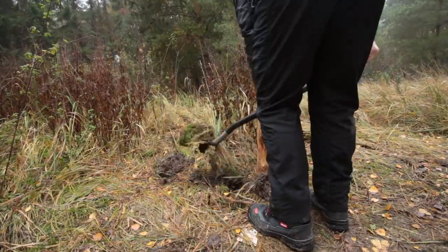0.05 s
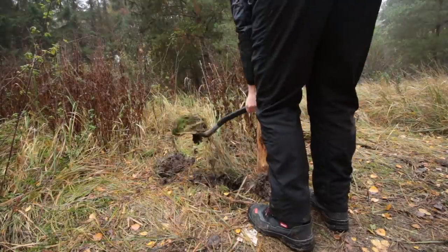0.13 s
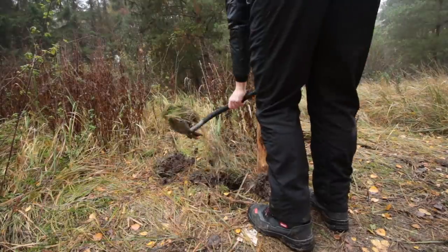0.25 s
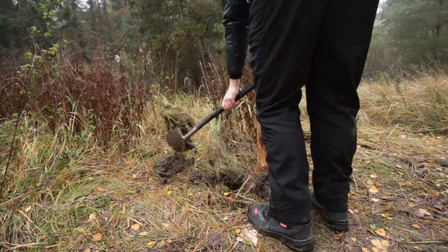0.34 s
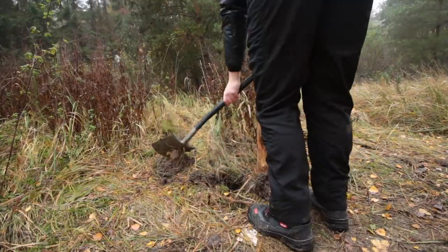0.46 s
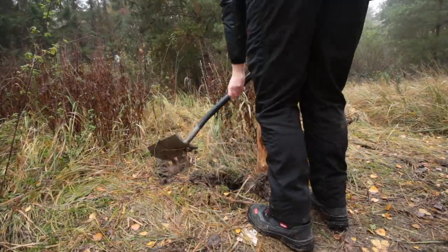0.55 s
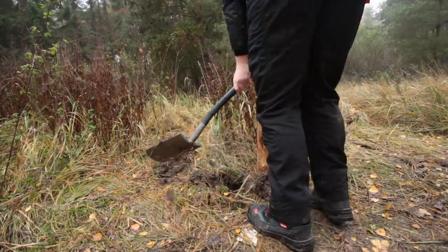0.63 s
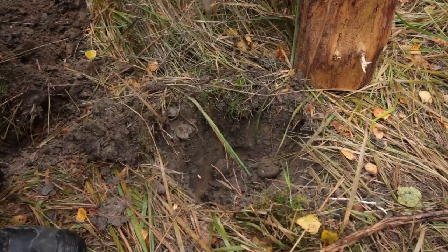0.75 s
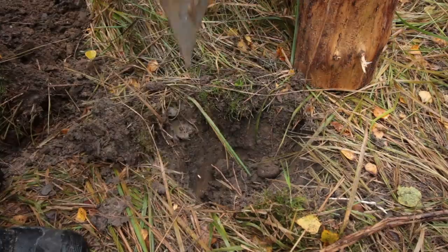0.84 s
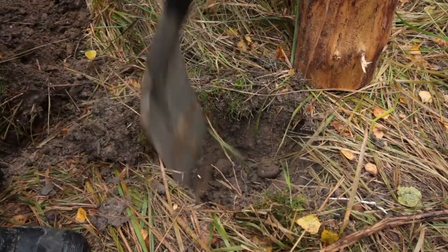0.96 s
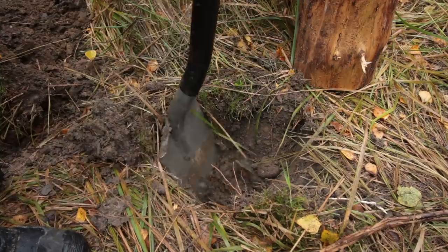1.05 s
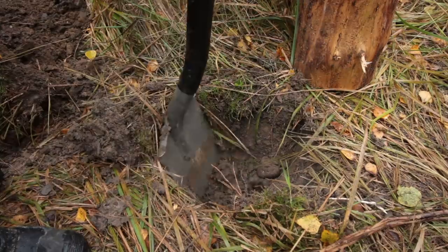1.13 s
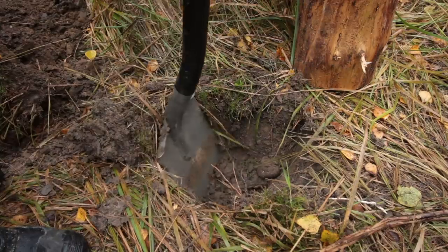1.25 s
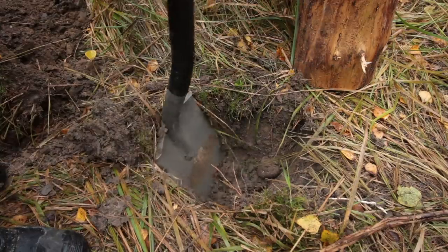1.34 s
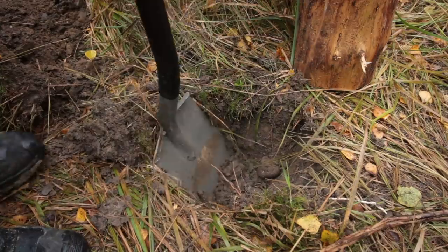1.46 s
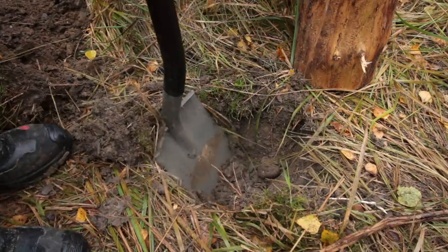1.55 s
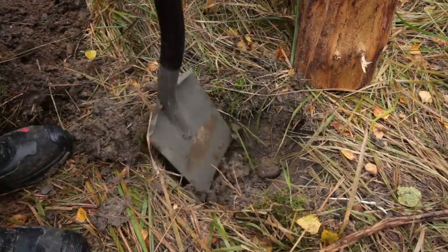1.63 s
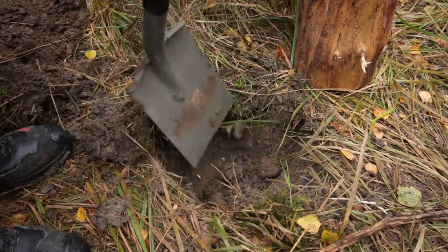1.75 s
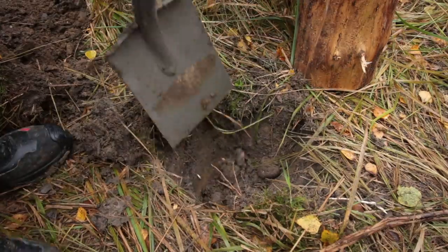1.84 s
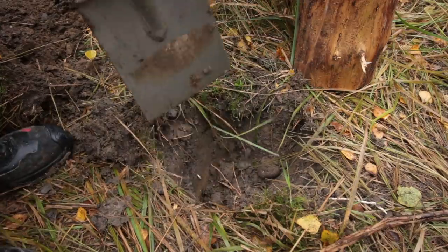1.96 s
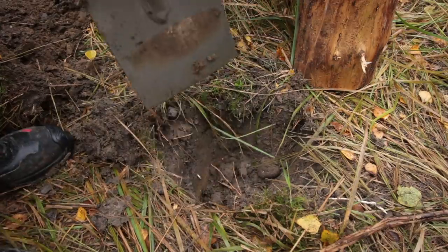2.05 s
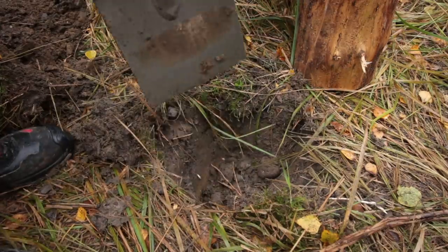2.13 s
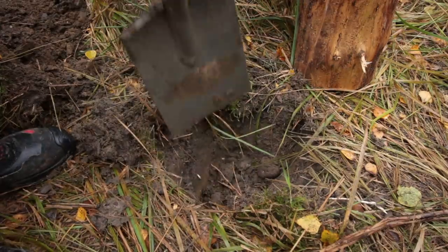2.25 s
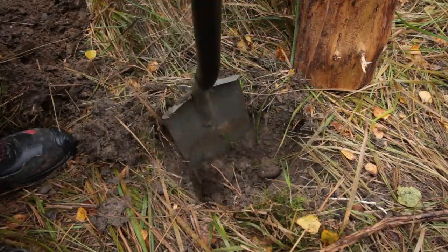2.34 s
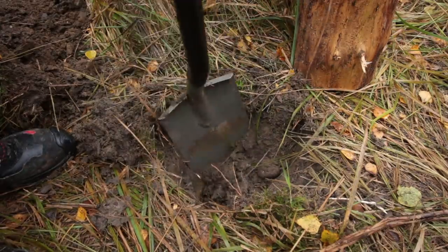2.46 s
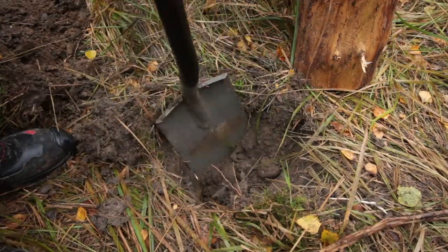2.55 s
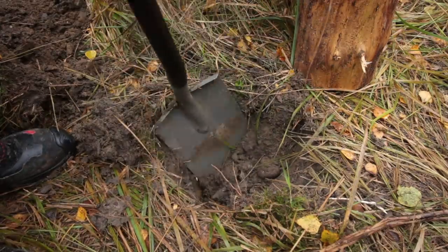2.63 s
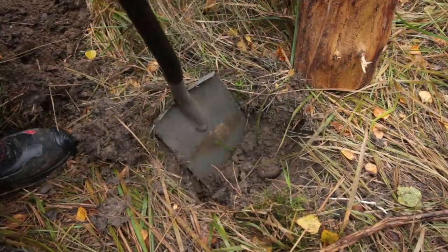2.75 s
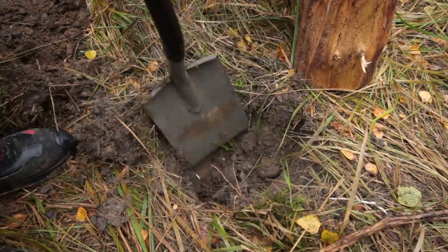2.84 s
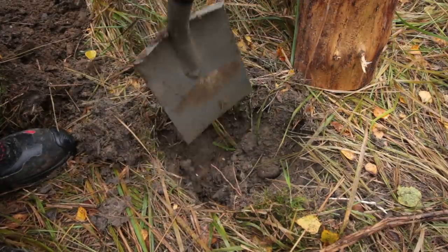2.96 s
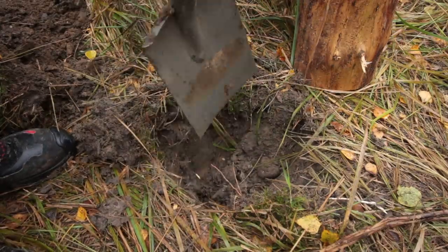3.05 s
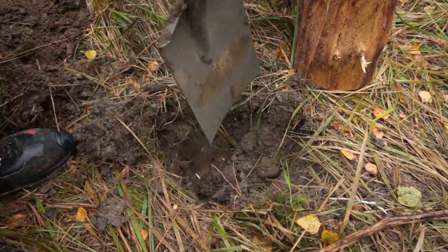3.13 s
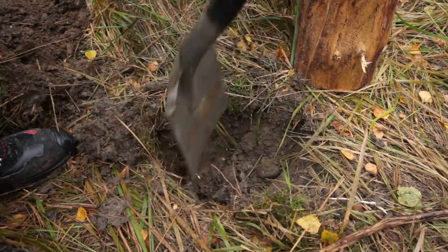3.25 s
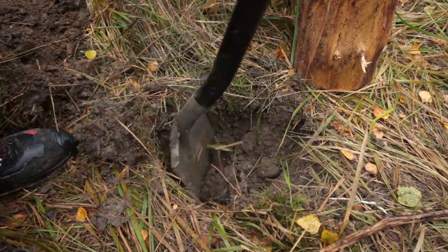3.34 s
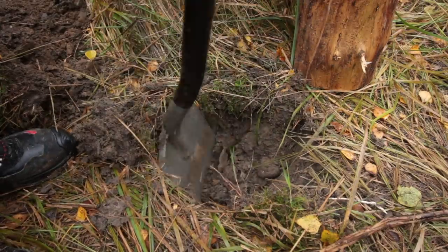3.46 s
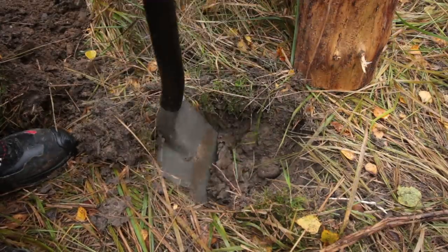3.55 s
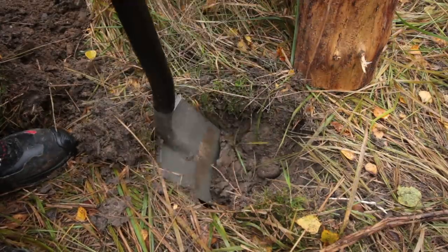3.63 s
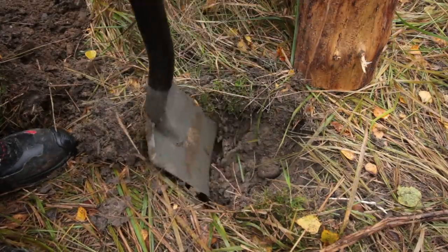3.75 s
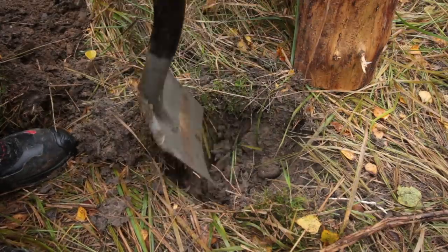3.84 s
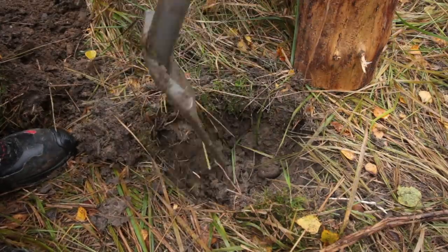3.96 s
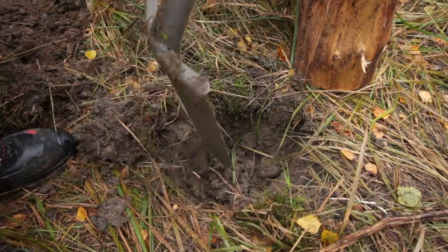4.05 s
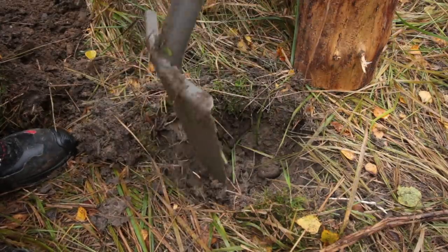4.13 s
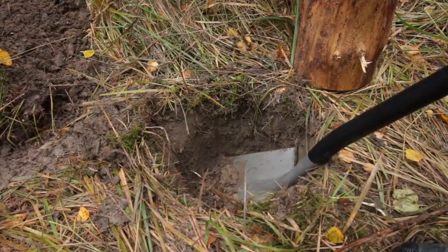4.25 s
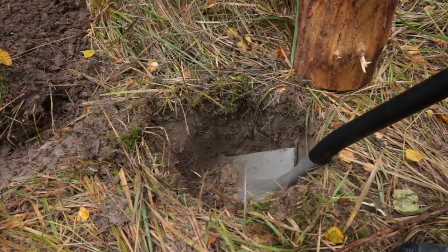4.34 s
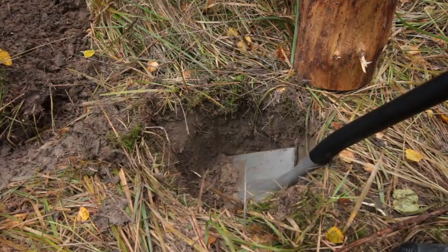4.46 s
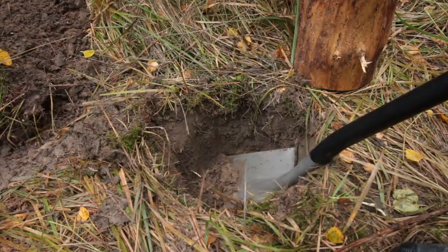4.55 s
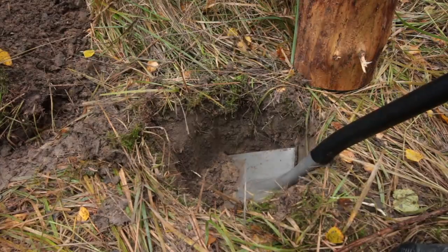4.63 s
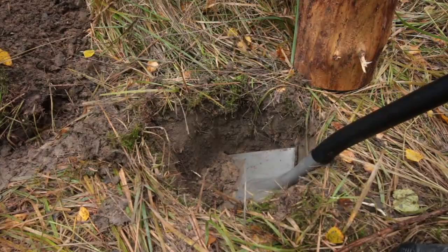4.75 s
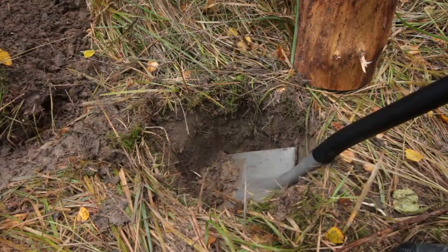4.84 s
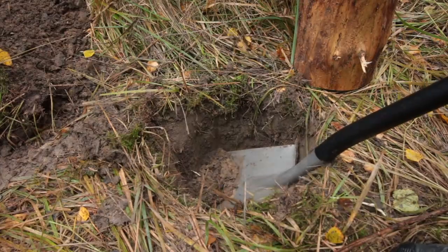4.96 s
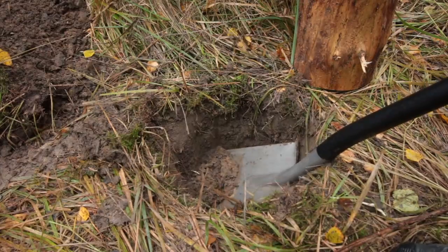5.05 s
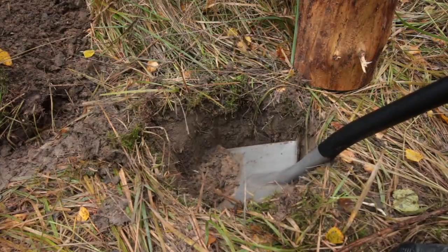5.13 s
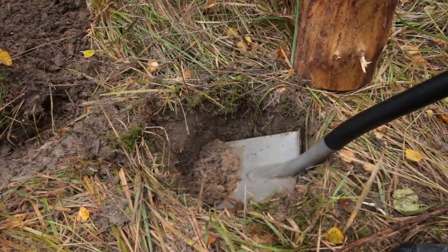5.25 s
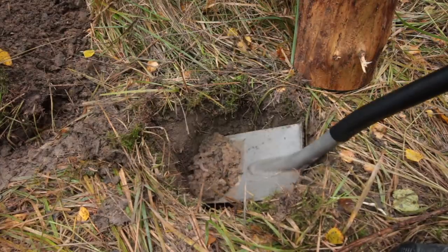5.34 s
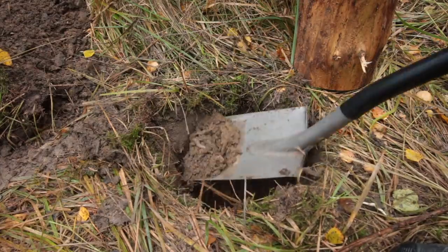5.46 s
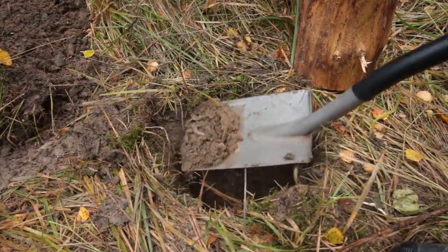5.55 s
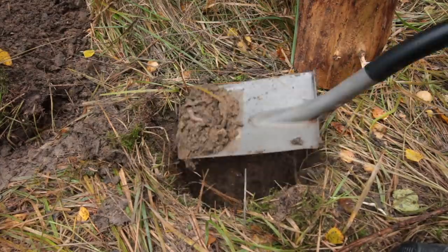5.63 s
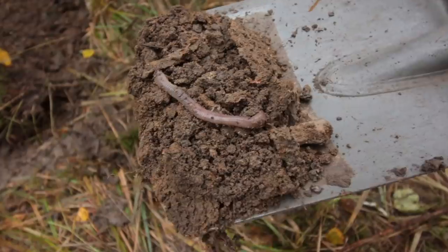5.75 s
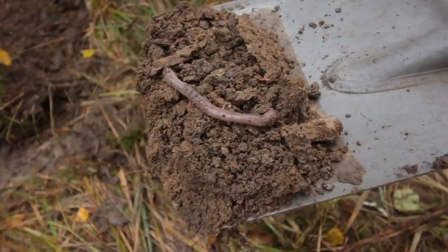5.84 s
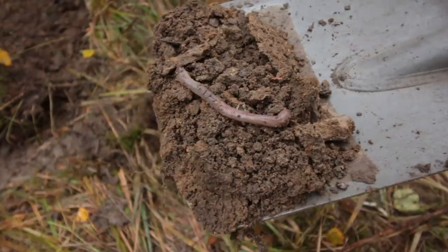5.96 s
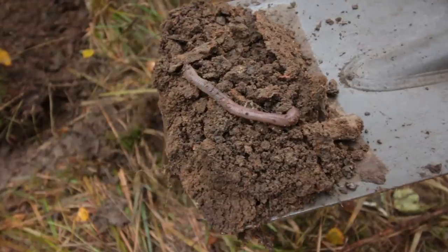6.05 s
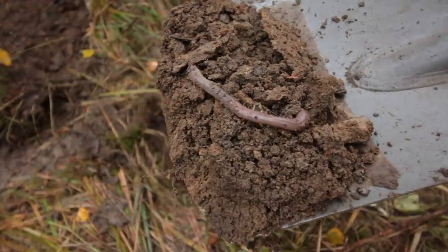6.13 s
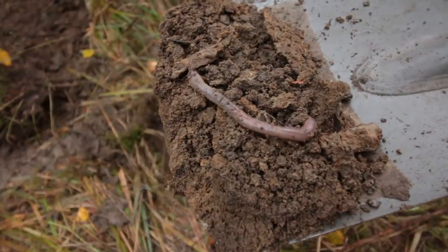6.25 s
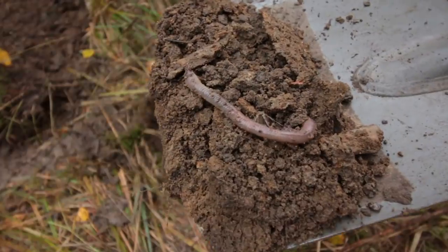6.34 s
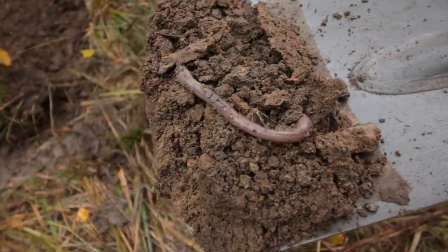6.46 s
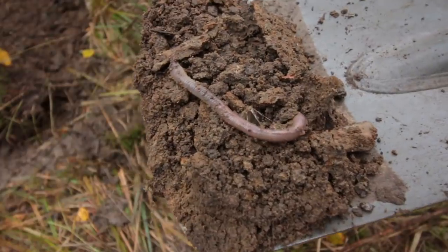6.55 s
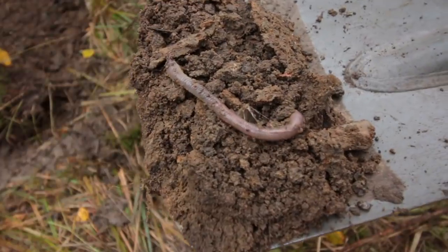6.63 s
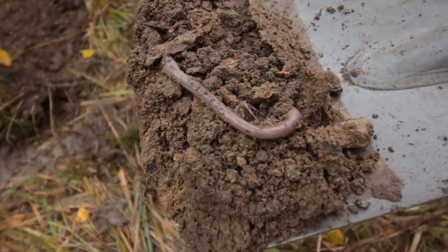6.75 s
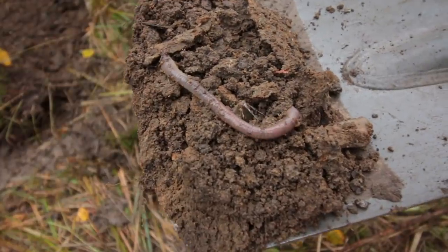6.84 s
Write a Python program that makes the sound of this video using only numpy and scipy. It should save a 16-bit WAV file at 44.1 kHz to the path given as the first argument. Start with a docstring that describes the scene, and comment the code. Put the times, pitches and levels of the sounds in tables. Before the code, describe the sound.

A quiet outdoor forest floor, heard close and dry over low air and microphone hiss. From 0 to 0.8 s cloth rustles softly and a boot crackles through dry grass. At about 1.05 s a steel spade stabs damp soil with a loud, bright, clipped crunch and low thump; faint gritty scrapes and thin steel ringing follow until 1.8 s. Cloth moves quietly. A second hard stab lands at 2.4 s, with grinding at 2.6 s and a soft metallic knock and ring near 2.85 s. The third and heaviest hits at 3.37 s, overloading, followed by dense snaps, scraping and a ringing withdrawal to 3.9 s. After cloth rustle, 4.35 to 5.1 s brings gentler pushes: root snaps, crumbling earth, short scrapes. Light grit and rustling accompany the lift until about 5.7 s, then only hiss with very faint thin whining tones remains.

```python
"""Forest floor, damp soil, quiet outdoors: a steel spade is stabbed in three times, worked to and fro,
pulled out ringing faintly, then pushed under a clod and lifted. Crowds of small fractures make the snaps and
crumbles, damped low swings the thumps; filtered clicks grind as grit and drive the ringing steel modes.
Cloth and grass rustle between the strokes over air and microphone hiss; the hardest blows overload the recorder."""
import sys
import numpy as np
from scipy import signal
from scipy.fft import rfft, irfft
from scipy.io import wavfile

SR = 44100
rng = np.random.default_rng(int(sys.argv[2]) if len(sys.argv) > 2 else 0)


def wav_record(signal):
    """Record a signal, one row per channel, as 16-bit PCM in the file named by sys.argv[1]."""
    frames = np.transpose(np.atleast_2d(signal))
    bounded = np.clip(frames, -1, 1)
    # unit amplitude maps onto the largest positive 16-bit level
    quanta = np.round(bounded * 32767).astype(np.int16)
    wavfile.write(sys.argv[1], SR, quanta)


def volts(x):
    """Linear amplitude factor 10**(x/20) for a level x in dB, scalar or array-like."""
    e = np.asarray(x, float) / 20
    return 10 ** e


N = 303928  # length [samples]


def rms_one(x):
    """Scale to a root mean square of 1."""
    return x / np.sqrt(np.mean(x ** 2) + 1e-20)


def colour(x, spectrum, size=4096):
    """Causal (minimum phase) filter with the shape of the given spectrum and unit power gain."""
    hz, db = np.transpose(spectrum)
    bins_hz = np.arange(size // 2 + 1) * SR / size
    log_gain = np.interp(np.log(bins_hz + 1), np.log(hz), db) * np.log(10) / 20
    # folding the cepstrum onto positive time gives minimum phase
    cepstrum = irfft(log_gain)
    cepstrum[1:size // 2] *= 2
    cepstrum[size // 2 + 1:] = 0
    response = irfft(np.exp(rfft(cepstrum)))
    return signal.oaconvolve(x, response / np.linalg.norm(response))[:len(x)]


def drift(rate_hz):
    """Slow random wandering of rms 1: smoothed noise at every 16th sample, joined by straight lines."""
    r = np.exp(-32 * np.pi * rate_hz / SR)
    noise = rng.standard_normal(N // 16 + 3001)
    slow = signal.lfilter([1], [1, -2 * r, r * r], noise)[3000:]  # skip the filter's start
    return np.interp(np.arange(N) / 16, np.arange(len(slow)), rms_one(slow))


def grains(per_s, spread_db, clump_db, clump_rate_hz):
    """Random clicks of uneven size that come in clumps; rms 1."""
    sizes = volts(spread_db * np.minimum(rng.exponential(1, N), 5)) * rng.choice([-1, 1], N)
    struck = rng.random(N) < per_s / SR
    return rms_one(sizes * struck * volts(clump_db * drift(clump_rate_hz)))


def resonance(x, hz, width_hz):
    """One damped mode: a two-pole band-pass whose ring shortens as it widens."""
    r = np.exp(-np.pi * width_hz / SR)
    poles = [1, -2 * r * np.cos(2 * np.pi * hz / SR), r * r]
    return signal.lfilter([(1 - r * r) / 2, 0, (r * r - 1) / 2], poles, x)


# roots and stones snap under the edge:
# (time [s], crest level [dB], centre [Hz], fade to -10 dB [ms])
SNAPS = [(0.982, -47.5, 2450, 1.3), (1.032, -39, 2840, 0.65), (1.0481, -9.5, 3449, 1),
         (1.051, -10, 1460, 12), (1.069, 2.5, 4740, 7.1), (1.137, -30, 2250, 2.13), (1.234, -44, 5100, 3.9),
         (1.258, -47, 2260, 4.2), (1.556, -27.5, 3920, 6), (1.594, -28, 2820, 1.6), (1.645, -41.5, 3550, 3),
         (2.391, 1.5, 1660, 5.5), (2.613, -27, 3600, 7.9), (2.675, -35.5, 3450, 9.4), (3.061, -55, 888, 2),
         (3.361, -10, 2560, 17.5), (3.366, 5, 2730, 3.6), (3.396, -10.5, 2780, 4.4),
         (3.4965, -14.5, 3810, 2.2), (3.523, -18.5, 4150, 11), (3.547, -19.5, 4630, 1.8),
         (3.569, -17.5, 4170, 3.4), (3.586, -23.5, 3950, 2.8), (3.684, -42, 4500, 2),
         (4.108, -51.5, 952, 1.92), (4.545, -35.5, 1290, 3.7), (4.631, -28, 3930, 2.7),
         (4.82, -33.5, 1350, 2.9), (4.842, -27, 2150, 3.1), (4.856, -27, 2150, 2.8),
         (4.866, -27.5, 3960, 7.8), (4.968, -20.5, 1310, 2.8), (4.979, -17, 1300, 8.4),
         (5.255, -47, 700, 3.3), (5.685, -45.5, 752, 4)]
# lumps of earth give way:
# (time [s], crest level [dB], centre [Hz], swell from -10 dB [ms], dull part over the crest level [dB])
CRUMBLES = [(1.059, -18, 1670, 14, -12), (1.078, -11.5, 2620, 13, -9.5), (1.167, -38, 1500, 6.1, -17),
            (2.381, -34, 1630, 12, -10.5), (2.408, -5, 4100, 14, -15.5), (2.592, -26.5, 1530, 8.2, -10),
            (2.628, -28.5, 620.6, 10, -6.5), (3.38, -16, 2300, 18, -8), (3.402, -12.5, 3740, 16, -17),
            (3.626, -31.5, 3870, 12, -6.5), (3.792, -32.5, 3280, 12, -26), (4.449, -29, 1640, 8.8, -10),
            (4.47, -35, 3650, 8.2, -1), (4.649, -33.5, 1920, 5.7, -13.5), (4.704, -27.5, 1310, 12, -3),
            (4.999, -25, 2840, 6.7, -8), (5.3, -40.5, 1160, 5.8, -34), (5.545, -39.5, 3600, 17, -5.5)]
# relative spectrum of gritty contact: (frequency [Hz], level [dB per Hz])
GRIT = [(300, -29), (700, -3), (1400, 0), (4000, -2.5), (5500, -4.5), (8000, -14), (15500, -24.5),
        (18000, -53)]
# relative spectrum of dull, heavy clods: (frequency [Hz], level [dB per Hz])
CLOD = [(70, -40), (200, -4), (350, 0), (650, -7), (1500, -36)]
SNAP_DULL_DB = -18  # dull part of a snap over its crest level
# snaps louder than the big level build slightly faster
SNAP_SWELL_MS, BIG_SNAP_DB, SWELL_MS_PER_DB = 1.2, -20.5, -0.0063
CRUMBLE_FADE_SHARE = .7  # fade time as a share of the swell


def crunches():
    """Each burst is a crowd of fractures that swells, snaps and is choked; returns the bright and dull parts."""
    bright, dull, lead = np.zeros(N), np.zeros(N), SR // 10
    ms = np.arange(-lead, 2 * lead) * 1000 / SR
    fractures = grains(9000, 2.4, 2.4, 200)
    lumps = rng.standard_normal(N)
    bursts = []
    for s, db, hz, fade in SNAPS:
        swell = SNAP_SWELL_MS + SWELL_MS_PER_DB * max(db - BIG_SNAP_DB, 0)
        bursts.append((s, db, hz, SNAP_DULL_DB, swell, fade))
    for s, db, hz, swell, dull_db in CRUMBLES:
        bursts.append((s, db, hz, dull_db, swell, CRUMBLE_FADE_SHARE * swell))
    for s, crest_db, hz, dull_db, swell, fade in bursts:
        span = slice(round(s * SR) - lead, round(s * SR) + 2 * lead)
        # 10 dB down at swell and fade, then ever faster
        shape = volts(-10 * np.where(ms < 0, -ms / swell, ms / fade) ** 1.7)
        burst = shape * fractures[span]
        burst[lead] += 24 / (swell + fade)  # the shorter the burst, the more it is one snap
        # bursts of lower centre break duller
        burst = signal.lfilter(*signal.butter(1, min(5.0 * hz, .4 * SR), fs=SR), burst)
        broad = 0.75 * resonance(burst, hz, 0.66 * hz)
        narrow = 1.5 * resonance(burst, hz, 0.028 * hz)
        bright[span] += volts(crest_db - 5.5) * (0.89 * burst + broad + narrow)
        dull[span] += volts(crest_db + dull_db - 1) * shape ** 0.87 * lumps[span]
    return colour(bright, GRIT), colour(dull, CLOD)


# the ground takes the blow: (time [s], level [dB], starting pitch [Hz], t60 [s])
THUMP = [(1.077, -27, 64.3, 0.22), (2.406, -14.5, 56.2, 0.11), (2.593, -38, 63.7, 0.23),
         (3.366, 1, 261.7, 0.066), (3.367, -37.5, 66.75, 0.35), (3.827, -48, 142, .15),
         (4.3, -61.5, 70, 0.97)]
THUMP_SAG = 0.64  # share of its starting pitch that the swing loses per second


def thumps():
    """A low damped swing of the ground, roughened by rumble."""
    out, t = np.zeros(N), np.arange(SR // 2) / SR
    for s, level_db, hz, t60 in THUMP:
        start = round(s * SR)
        shape = volts(level_db - 60 * t / t60) * (1 - np.exp(-t / 0.0013))
        swing = np.sin(2 * np.pi * hz * (t - THUMP_SAG * t ** 2 / 2))
        rumble = rms_one(resonance(resonance(rng.standard_normal(len(t)), hz, 120), hz, 120))
        out[start:start + len(t)] += shape * (.5 * swing + .5 * rumble)
    return out


# each push, pull or twist of the blade in the soil: (start [s], length [s], grit level at start [dB],
# grit level at end [dB], clod rumble over the grit [dB])
SCRAPES = [(1.103, .08, -45.5, -50.5, -11), (1.271, 0.2, -49.5, -51, -10),
           (1.564, 0.038, -43.5, -49.5, -5.5), (1.645, 0.057, -47.5, -45.5, -14),
           (1.756, 0.041, -46, -56, -9.5), (2.43, .05, -48, -48.5, -14), (2.49, 0.062, -41, -45, -14.5),
           (2.595, .14, -34, -46, -12), (2.837, 0.046, -44.5, -43, -21), (2.959, 0.037, -57.5, -59, -5),
           (3.413, 0.038, -34, -37, -25), (3.492, .09, -29.5, -35.5, -30), (3.592, 0.071, -38.5, -34, -4),
           (3.764, .13, -36.5, -55, -18), (4.354, .115, -49, -39.5, -4.5),
           (4.509, 0.089, -54.5, -46.5, -6.5), (4.643, 0.081, -36, -42.5, -8.5),
           (4.768, .14, -49.5, -40.5, -5), (4.964, 0.04, -37, -38.5, -7), (5.047, 0.052, -52.5, -57, -3.5),
           (5.175, .17, -59, -51, -5), (5.369, .19, -49.5, -58, -12)]
BITE_DB_PER_S, LET_GO_DB_PER_S = 800, 323  # how fast a scrape sets in, and how fast it dies


def scrape_gains():
    """Gain of grit and of clods: a slope over each scrape, a quick bite before it and a slower release after."""
    t, grit, clods = np.arange(N) / SR, 0, 0
    for start, length, start_db, end_db, clod_db in SCRAPES:
        bite_db = BITE_DB_PER_S * np.maximum(start - t, 0)
        release_db = LET_GO_DB_PER_S * np.maximum(t - start - length, 0)
        slope_db = np.interp(t, [start, start + length], [start_db, end_db])
        gain = volts(slope_db - np.minimum(bite_db + release_db, 200))
        grit = grit + gain
        clods = clods + gain * volts(clod_db)
    return grit, clods


def pebbles(force, count, cycles):
    """Every grain has a size: the clicks are dealt to short resonances spread from 500 Hz to 14 kHz."""
    dealt = rng.integers(0, count, N)
    out = 0
    for k, hz in enumerate(np.geomspace(500, 14000, count)):
        out = out + resonance(force * (dealt == k), hz, hz / cycles) * volts(4.5 * drift(12))
    return out


# modes of the steel: (frequency [Hz], drive level [dB], t60 before damping [s])
BLADE = [(749.4, -7.5, 1), (1310, -8, 1), (1373, -3.5, 0.86), (1490, -7, 0.69), (1870, -11, 0.69),
         (2150, -13.5, 0.39), (2260, -5, 1), (2229, -4, 0.75), (2460, -11.5, 0.9), (2860, 2.5, 0.97),
         (3282, -15, .2), (3340, -4, 0.098), (4250, -14, 0.03)]


def blade(force, damping):
    """Steel modes driven by a force; damping divides every t60, the wandering contact favours mode after mode."""
    out = 0
    for hz, level_db, t60 in BLADE:
        contact = volts(level_db + 5.0 * np.tanh(drift(9)))
        out = out + resonance(contact * force, hz, damping * np.log(1000) / (np.pi * t60))
    return out


# the blade slides clear of the soil and can ring:
# (from [s], to [s], freedom [dB], frequency favoured by the place of contact [Hz])
FREE = [(1.28, 1.46, 21, 2230), (1.58, 1.73, 26, 2230), (1.69, 1.8, 22, 1400), (1.755, 1.79, 17, 2850),
        (2.84, 3.0, 25, 1360), (2.88, 2.95, 24, 1820), (3.755, 3.865, 25, 1350), (3.79, 3.9, 25, 2250)]
FAVOURED_WIDTH_HZ = 350
TICKS_PER_S, TICK_DB = 250, -8  # small stones catching on the edge; level in the grit mix


def grinding():
    """Grit and clods slide along the blade; where it comes free of the soil it sings."""
    grit_gain, clod_gain = scrape_gains()
    t = np.arange(N) / SR
    clicks = grains(4700, 1.9, 2.1, 37)
    stones = rms_one(colour(pebbles(clicks, count=14, cycles=8.3), GRIT))
    ticks = pebbles(grains(TICKS_PER_S, 2.0, 2.0, 10), count=8, cycles=2.5)
    grit = 0.51 * colour(clicks, GRIT) + 0.53 * stones + volts(TICK_DB) * rms_one(colour(ticks, GRIT))
    clods = clod_gain * colour(grains(900, 3.5, 3.0, 20), CLOD)
    force = grit_gain * clicks
    free = 0
    for start, end, db, hz in FREE:
        free = free + volts(db) * resonance(force * ((t > start) & (t < end)), hz, FAVOURED_WIDTH_HZ)
    return grit_gain * grit + blade(free, damping=3) + blade(force, damping=6) + clods


# the free blade is knocked softly as it leaves the cut:
# (time [s], push level [dB], contact cut-off [Hz])
KNOCKS = [(2.85, 20, 800), (2.965, 8, 1600), (3.88, 13, 800)]


def knocks():
    """A soft contact, a smooth push about 1 / cut-off long, rings mostly the low modes of the steel."""
    force = np.full(N, 1e-18)  # never quite zero
    for s, db, cut_hz in KNOCKS:
        push = np.hanning(round(SR / cut_hz) + 2)
        start = round(s * SR)
        force[start:start + len(push)] += volts(db) * push / push.sum()
    return blade(force, damping=1.5)


# cloth moving: (time [s], level [dB])
RUSTLE = [(0.01, -50.5), (0.5, -59), (0.58, -56), (0.72, -54.5), (0.785, -53.5), (0.8, -63), (1.03, -60.5),
          (1.1, -77), (1.78, -72.5), (1.85, -58), (2.15, -65), (2.35, -55), (2.45, -75.5), (3.02, -62),
          (3.15, -65), (3.335, -54), (3.45, -75.5), (4.2, -63.5), (4.3, -56.5), (4.4, -56), (5.08, -62.5),
          (5.14, -56), (5.28, -52), (5.6, -51.5), (5.74, -59.5), (5.755, -89.5)]
# relative spectrum of cloth: (frequency [Hz], level [dB per Hz])
CLOTH = [(100, -11.5), (450, -14), (1200, -6), (4100, -5), (6500, -18.5), (15500, -39)]
# a boot brushes dry grass: (from [s], to [s], level of the clicks before brightening [dB])
GRASS_STEP = (.55, .795, -72)
# weaker rubbing loses its treble first: treble follows the gain to this further power
CLOTH_SPLIT_HZ, CLOTH_FULL_DB, TREBLE_FOLLOWS = 1200, -52, 0.68


def rustle():
    """Soft dense friction of cloth, and a brighter crackle of grass."""
    t = np.arange(N) / SR
    start, end, grass_db = GRASS_STEP
    crackle = np.diff(grains(6000, 3.0, 1.7, 30), prepend=0)  # differencing brightens
    grass = volts(grass_db) * ((t > start) & (t < end)) * crackle
    gain = volts(np.interp(t, *np.transpose(RUSTLE)))
    cloth = colour(grains(15000, 2, 1, 15), CLOTH)
    low = signal.lfilter(*signal.butter(1, CLOTH_SPLIT_HZ, fs=SR), cloth)
    treble = (cloth - low) * (gain / volts(CLOTH_FULL_DB)) ** TREBLE_FOLLOWS
    return gain * (low + treble) + grass


# relative spectrum of outdoor air and microphone hiss: (frequency [Hz], level [dB per Hz])
AIR = [(12, -34.5), (20, 4), (291, -3.5), (431, -4), (3210, -10), (3800, -13), (5310, -17.5), (15800, -23)]
AIR_DB = -69  # rms level of air and hiss
# thin tones close to the microphone: (frequency [Hz], middle level [dB rms])
WHINE = [(290.7, -100), (3025, -87), (3784, -82), (3946, -93)]
WHINE_FROM_S = 5.2


def background():
    """Outdoor air and microphone hiss as shaped noise; at the end thin wavering tones and a narrow hiss join."""
    t = np.arange(N) / SR
    air = volts(AIR_DB) * colour(rng.standard_normal(N), AIR)
    tones = 0
    for hz, db in WHINE:
        tones = tones + volts(db + 2.6 * drift(8.7)) * np.sqrt(2) * np.sin(2 * np.pi * hz * t)
    narrow = resonance(resonance(rng.standard_normal(N), 4000, 400), 3680, 400)
    narrow_hiss = volts(-75.5) * rms_one(narrow)
    return air + (tones + narrow_hiss) * (t > WHINE_FROM_S)


def scene():
    """Spade, ground, clothing and outdoor floor summed at one microphone."""
    bright, dull = crunches()
    muffled_steel = .5 * blade(bright, damping=20)
    strokes = bright + muffled_steel + dull + thumps() + grinding() + knocks()
    return (strokes + rustle() + background())[None]


def roll_off(x):
    """The treble ends steeply here."""
    return signal.sosfilt(signal.butter(12, 15910, fs=SR, output="sos"), x)


def record(dry):
    """The microphone drops the deepest bass; the hardest blows hit full scale and are cut flat."""
    low_cut = signal.butter(2, 48.0, "high", fs=SR, output="sos")
    mix = np.clip(signal.sosfilt(low_cut, dry), -1, 1)
    return roll_off(mix)


dry = scene()
out = record(dry)
wav_record(out)
```